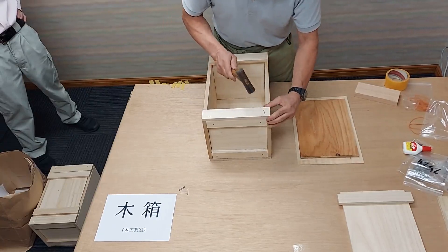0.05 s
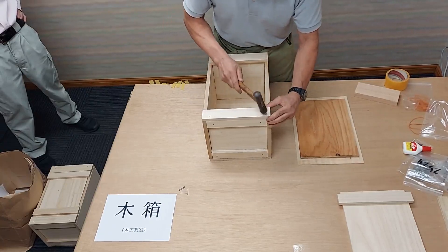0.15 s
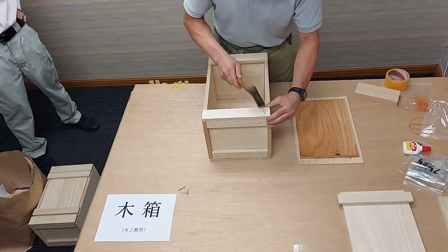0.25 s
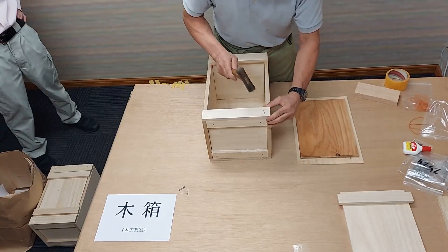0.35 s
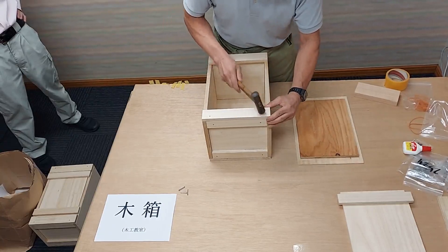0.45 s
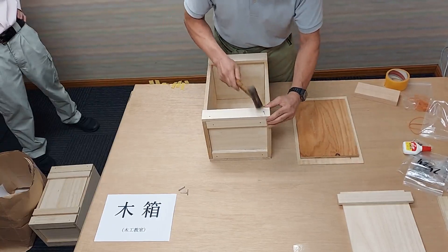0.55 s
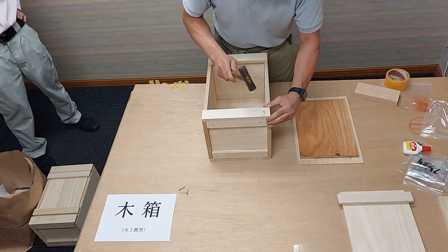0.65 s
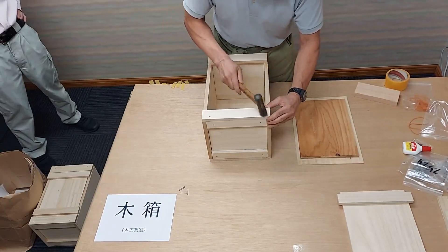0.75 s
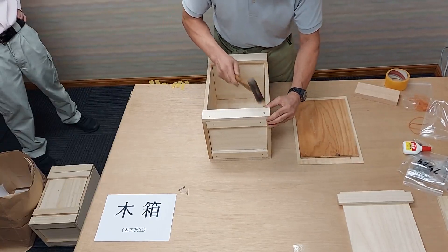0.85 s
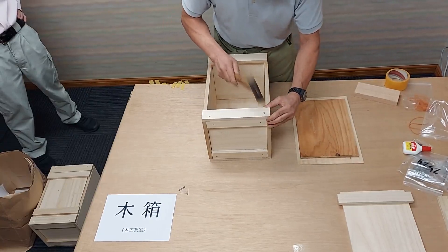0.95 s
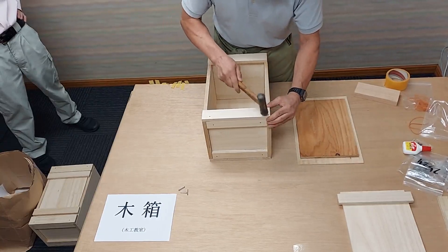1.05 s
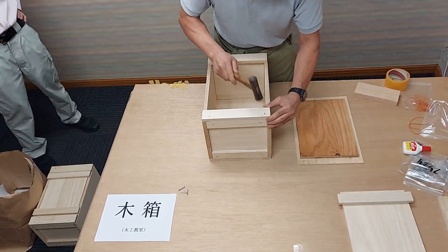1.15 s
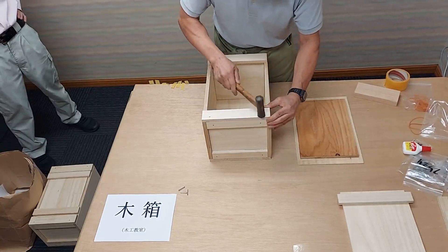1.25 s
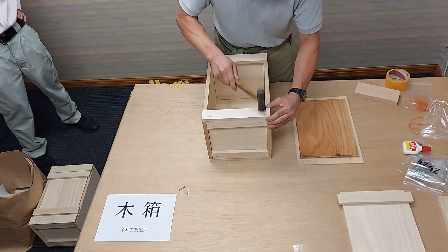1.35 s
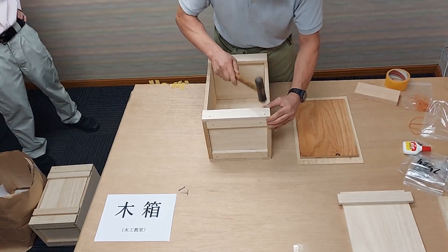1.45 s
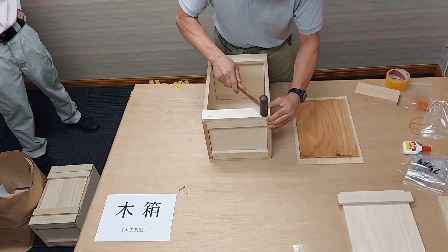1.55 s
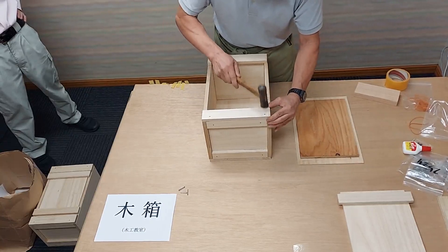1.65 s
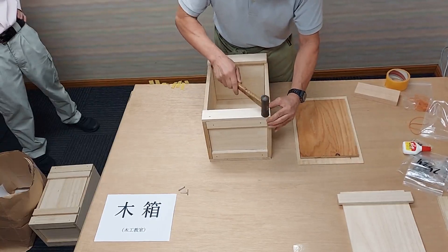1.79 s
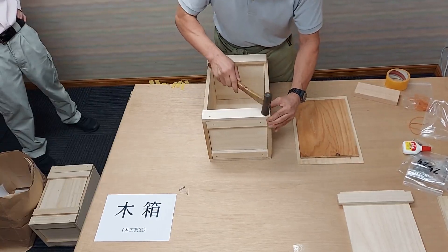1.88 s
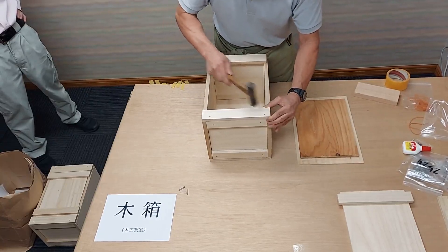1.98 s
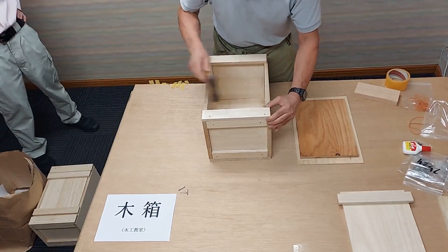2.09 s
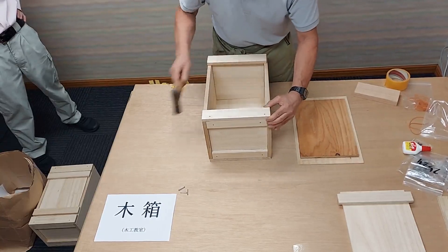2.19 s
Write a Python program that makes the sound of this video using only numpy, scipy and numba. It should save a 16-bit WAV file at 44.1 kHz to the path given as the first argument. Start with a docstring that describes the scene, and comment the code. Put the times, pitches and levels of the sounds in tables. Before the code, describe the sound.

Seven steady hammer knocks on a hollow wooden box, loud and slightly squashed by the camera's limiter, with table thump and short room echoes; a thin metallic ring follows the last, over soft air noise.

```python
"""A small steel hammer strikes a wooden strip on a wooden box seven times, on a table in a small carpeted room.
Each blow cracks (shaped clicks), rings the box and booms in table and room modes (fading sines).
The walls answer each blow with a short tail of fading noise bands; a thin metallic ring follows the last one.
Faint ventilation noise lies underneath, in stereo at the microphones.
The camera's limiter holds down the first moments of every blow."""
import sys
import numpy as np
from scipy import signal
from scipy.fft import rfft, irfft
from scipy.io import wavfile
from scipy.ndimage import uniform_filter1d, minimum_filter1d
from numba import njit

SR = 44100
rng = np.random.default_rng(int(sys.argv[2]) if len(sys.argv) > 2 else 0)


def file_out(sig):
    """Save sig as 16-bit WAV at sys.argv[1]."""
    # one column per channel
    cols = np.atleast_2d(sig).T
    # limit, then scale
    lim = np.clip(cols, -1, 1)
    pcm = np.round(lim * 32767).astype(np.int16)
    wavfile.write(sys.argv[1], SR, pcm)


N = 97020  # length [samples]
TAIL = 24000  # length of one blow with its echoes [samples]
LEFT_RIGHT = np.array([[1], [-1]])  # sign of the side signal at each microphone channel


def undb(db):
    """Decibels to gain."""
    return 10 ** (np.asarray(db) / 20)


def read(table, hz):
    """Interpolate a (frequency [Hz], value) table on a log-frequency axis."""
    table = np.array(table)
    return np.interp(np.log(hz), np.log(table[:, 0]), table[:, 1])


def unit(x):
    """Scale to energy 1."""
    return x / np.sqrt(np.sum(x ** 2))


def ring(t, hz, t60, lead=0):
    """One struck mode: a sine that falls 60 dB in t60 seconds, silent until t passes 0."""
    return np.sin(2 * np.pi * hz * t + lead) * 1000. ** (-t / t60) * (t > 0)


def click(db, size=2048):
    """Minimum-phase click, its energy as early as the spectrum (dB on the rfft grid) allows."""
    cepstrum = irfft(db * np.log(10) / 20, size)
    # folding the cepstrum onto positive times makes the click causal
    cepstrum[1:size // 2] *= 2
    cepstrum[size // 2 + 1:] = 0
    return irfft(np.exp(rfft(cepstrum)), size)


def bands(size):
    """Independent mid and side noise, split into overlapping third-octave bands: (centre Hz, mid, side)."""
    spectrum = rfft(rng.standard_normal((2, size)))
    f = np.fft.rfftfreq(size, 1 / SR) + 1e-9
    for hz in 30 * 2 ** (np.arange(29) / 3):
        power = np.clip(1 - abs(3 * np.log2(f / hz)), 0, 1)
        mid, side = irfft(spectrum * np.sqrt(power), size)
        yield hz, mid, side


# spectrum of the ventilation's broad noise in the room: (frequency [Hz], relative level [dB per Hz])
AIR = [(30, -17.5), (60, 3.5), (150, -6.5), (450, -6.5), (900, -13.5), (1300, -18), (1900, -25.5),
       (2150, -26), (2700, -30), (3300, -44.5), (8000, -38.5), (16000, -55)]
# narrow whistling bands: (frequency [Hz], width of one filter pass [Hz], RMS level of the mid [dB])
AIR_PEAKS = [(900, 120, -73), (1545, 60, -73), (2320, 110, -75), (2450, 70, -77)]
AIR_DB = -59  # RMS of the broad noise


def air():
    """Ventilation: soft broad noise, wider in the treble, with a few resonances whistling in it."""
    broad = 0
    for hz, mid, side in bands(N):
        width = min(hz / 1300.0, 1)
        broad = broad + undb(read(AIR, hz)) * (mid + width * side * LEFT_RIGHT)
    out = broad * undb(AIR_DB) / broad.std()
    for hz, width_hz, db in AIR_PEAKS:
        peak = signal.iirpeak(hz, hz / width_hz, SR)
        once = signal.lfilter(*peak, rng.standard_normal((2, N)))
        mid, side = signal.lfilter(*peak, once)
        out = out + undb(db) * (mid + side * LEFT_RIGHT) / mid.std()
    return out


# first arrivals, equal at both microphones: tick, blow, rebound, table bounce
# (time [ms], relative level [dB])
ARRIVALS = [(0., -12), (1.1, 0), (1.35, -1), (2.3, -5)]
# the direct sound is brighter than the echoes: (frequency [Hz], gain [dB])
CRACK_TILT = [(300, -3), (1200, 0), (2500, 1), (5000, 3), (12000, -1)]
DIRECT_DB = -16  # added to every arrival


def direct_crack(f):
    """The straight path to the microphones: a few brightened impulses in the first milliseconds."""
    first = np.zeros(256)
    for ms, db in ARRIVALS:
        first[int(ms * SR / 1000)] += undb(DIRECT_DB + db)
    return np.convolve(first, click(read(CRACK_TILT, f)))


# spectrum of the bare crack: (frequency [Hz], relative level [dB per Hz])
KNOCK = [(120, -57), (200, 2.5), (529, 1), (777, -4), (1020, -4), (1620, -8), (2330, -9), (5730, -18.5),
         (7010, -18), (13300, -30), (16000, -35)]
KNOCK_LOW_HZ = 250  # below this the boom takes over


def crack_spectrum(f):
    """Steel on wood: a broad spectrum (dB), low end cut, scaled so that its click has energy 1."""
    db = read(KNOCK, f) - 20 * np.log10(1 + (KNOCK_LOW_HZ / f) ** 4)
    return db - 20 * np.log10(np.linalg.norm(click(db)))


# table and room modes: (frequency [Hz], level [dB], t60 [s], build-up [s], polarity [+1 or -1])
BOOM = [(57.0, -27.5, .66, .033, -1), (67.2, -17.8, .41, .011, 1), (98.7, .1, .13, .024, 1),
        (102.7, -2.7, .16, .03, -1), (125.4, -12.3, .33, .022, -1), (132.4, -26.3, .52, .006, 1),
        (165.5, -6.3, .21, .041, 1), (173.0, -.8, .13, .014, -1), (179.3, .6, .16, .049, 1),
        (97.0, -28, .5, .04, 1), (171.0, -27, .45, .04, 1), (233.6, -20, .37, .006, -1),
        (253.1, -29, .27, .002, -1), (285.0, -27, .33, .019, -1)]
# stereo spread of the boom, from a phase lead at the left microphone port:
# (frequency [Hz], side minus mid [dB])
BOOM_SIDE = [(60, -11.5), (100, -5.5), (170, -16), (280, -23)]


def table_boom(t):
    """Low modes of table and room: each swells over its build-up time while it rings down."""
    out = 0
    for hz, db, t60, rise, sign in BOOM:
        # leading on the left and lagging on the right by this angle gives the side its level
        lead = np.arctan(undb(read(BOOM_SIDE, hz))) * LEFT_RIGHT
        swell = 1 - np.exp(-t / rise)
        out = out + sign * undb(db) * swell * ring(t, hz, t60, lead)
    return out


# modes of the wooden box: frequency [Hz]
BOX_HZ = [360, 413, 465, 530, 626, 707, 800, 916, 1013, 1093, 1170, 1300, 2007, 2400]
# one row for each of BOX_HZ: (relative level [dB], t60 [s])
BOX = [(-8.5, 0.092), (-2, 0.041), (9.5, 0.027), (2, 0.051), (-0.5, 0.1), (0, 0.067), (-11, 0.12),
       (3.5, 0.034), (7.5, 0.025), (-3, .07), (3, 0.044), (-4, 0.013), (-19.5, .04), (-2, .03)]
BOX_DB = -8  # energy of the whole ring, before the blow's gain


def box_ring(t):
    """The box panels ring in modes of alternating polarity."""
    out = 0
    for k, (hz, (db, t60)) in enumerate(zip(BOX_HZ, BOX)):
        out = out + (-1) ** k * undb(db) * ring(t, hz, t60)
    return unit(out) * undb(BOX_DB)


# decay of the carpeted room: (frequency [Hz], t60 [s])
ROOM_T60 = [(200, 0.39), (400, 0.39), (900, 0.37), (2400, 0.31), (6400, 0.28), (14000, 0.21)]
# stereo spread of the echoes at the microphones: (frequency [Hz], side minus mid [dB])
ROOM_SIDE = [(60, -33), (110, 2), (200, -10), (380, -11.5), (700, -3.5), (1290, -0.5), (2380, -1),
             (4400, 0.5), (8120, 0), (15000, -3.5)]
ROOM_LAG_S, ROOM_RISE_S = 0.001077, 0.0035  # start after the tick, build-up
EARLY_DB, EARLY_T60_S = 9, 0.02  # table top and near wall: a stronger, quicker first answer


def echoes():
    """Diffuse answer of the walls: noise bands, each fading at its own rate."""
    t = np.maximum(np.arange(TAIL) / SR - ROOM_LAG_S, 0)
    early = undb(EARLY_DB) * 1000. ** (-t / EARLY_T60_S)
    out = 0
    for hz, mid, side in bands(TAIL):
        pair = mid + undb(read(ROOM_SIDE, hz)) * side * LEFT_RIGHT
        late = 1000. ** (-t / read(ROOM_T60, hz))
        out = out + pair * (late + early)
    return unit(out * (1 - np.exp(-t / ROOM_RISE_S)))


# the seven blows: (time [s], boom gain [dB], then six colour gains [dB], one at each of COLOUR_HZ)
BLOWS = [(0.23, 1.8, 1.3, -4, -3, 0, 1.5, 0.76), (0.5316, 3, -1.5, -1, -0.4, -0.4, 0.71, 1.4),
         (.8009, -0.2, -4, -3, -1.5, 0.1, 0.64, 0.18), (1.0597, -1, 0.5, -5.5, -1.8, -2, -0.013, -0.64),
         (1.3146, 0.9, -4.5, 7.5, 3, -0.5, -0.2, -1.7), (1.58, 1.5, 4.5, 4.5, -2.1, 0.2, 1.4, -0.016),
         (1.8342, -4, 5.5, 4.5, 3.5, -4, 0.93, -0.77)]
# where each blow's colour is given: frequency [Hz]
COLOUR_HZ = [270, 400, 550, 900, 3000, 10000]
KNOCK_DB, BOOM_DB = 23, 1  # gain of crack and box together, gain of the boom
BOX_NEAR_DB = -2.5  # the box ringing straight at the microphones, relative to its ring
SAME_PATH = 0.6  # share of the crack's echo energy that repeats from blow to blow
BALANCE_DB = 0.83  # left above right


def hammer():
    """Each blow excites crack and box, heard direct and through the walls, over the boom."""
    t = np.arange(TAIL) / SR
    f = np.maximum(np.fft.rfftfreq(2048, 1 / SR), 20)
    first, crack_db = direct_crack(f), crack_spectrum(f)
    boom, box = table_boom(t), box_ring(t[:8192])
    shared, box_walls = echoes(), echoes()
    near = int(ROOM_LAG_S * SR)
    out = np.zeros((2, N + 2 * TAIL))
    for s, boom_db, *colour_db in BLOWS:
        tint = read(list(zip(COLOUR_HZ, colour_db)), f)
        crack = click(crack_db + tint)
        body = np.convolve(box, click(tint))
        path = np.sqrt(SAME_PATH) * shared + np.sqrt(1 - SAME_PATH) * echoes()
        path[:, :len(first)] += first
        heard = signal.fftconvolve(path, crack[None], axes=1)[:, :TAIL]
        heard += signal.fftconvolve(box_walls, body[None], axes=1)[:, :TAIL]
        heard[:, near:near + len(body)] += body * undb(BOX_NEAR_DB)
        start = int(s * SR)
        # crack and box push with opposite polarity to the boom
        out[:, start:start + TAIL] += boom * undb(BOOM_DB + boom_db) - heard * undb(KNOCK_DB)
    return out[:, :N] * undb(LEFT_RIGHT * BALANCE_DB / 2)


RING_HZ, RING_S = 3360, 1.835  # frequency, start time
RING_DB, RING_T60_S = -64, 1.58  # starting amplitude, decay


def last_ring():
    """A thin metallic ring after the last blow: one slowly fading sine, centred."""
    return undb(RING_DB) * ring(np.arange(N) / SR - RING_S, RING_HZ, RING_T60_S)


def scene():
    """The room's air, the blows on the box and the last ring."""
    return air() + hammer() + last_ring()


@njit
def follow(x, down):
    """Peak follower: jumps up, sinks slowly."""
    level, out = 0., np.empty(len(x))
    for i in range(len(x)):
        level = max(x[i], level * down)
        out[i] = level
    return out


LIMIT_DB, RATIO = -1.5, 10.  # threshold, compression ratio above it
LOOK_S, RELEASE_S = .001, .012  # look-ahead, release time constant
BOTTOM_HZ, TOP_HZ = 38, 16000  # band limits


def limiter(dry):
    """One gain for both channels: it drops just ahead of loud peaks and recovers after them."""
    k = int(LOOK_S * SR) + 1
    loudest = np.abs(dry).max(axis=0)
    ahead = -minimum_filter1d(-loudest, 2 * k + 1)  # running maximum
    level = follow(ahead, np.exp(-1 / (RELEASE_S * SR)))
    gain = np.minimum(1, undb(LIMIT_DB) / (level + 1e-9)) ** (1 - 1 / RATIO)
    return dry * uniform_filter1d(gain, k)


def record(dry):
    """Camera microphones: look-ahead limiter, then bass cut and steep treble cut."""
    bass_cut = signal.butter(2, BOTTOM_HZ, "high", fs=SR, output="sos")
    treble_cut = signal.ellip(8, .2, 70, TOP_HZ, fs=SR, output="sos")
    held = signal.sosfilt(bass_cut, limiter(dry))
    return signal.sosfilt(treble_cut, held)


dry = scene()
out = record(dry)
file_out(out)
```